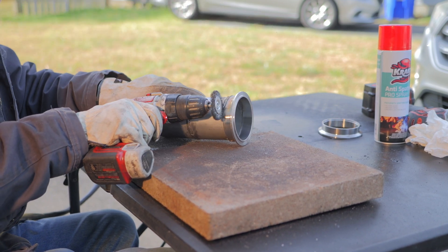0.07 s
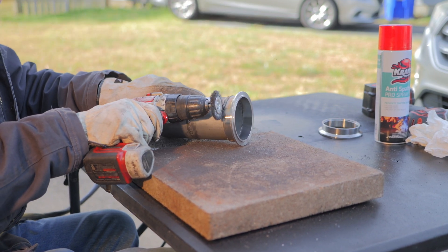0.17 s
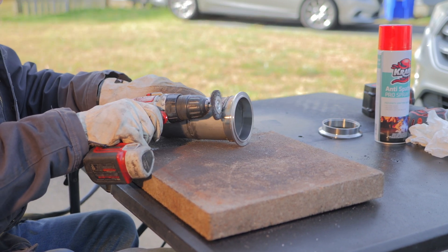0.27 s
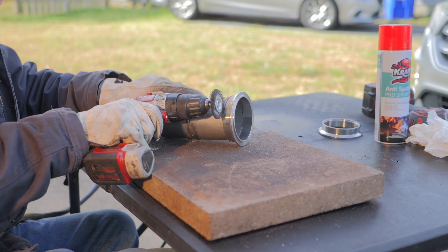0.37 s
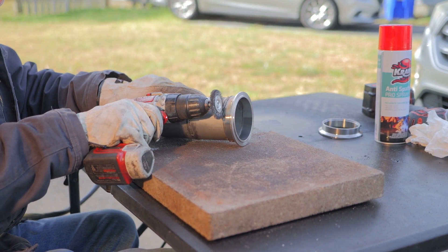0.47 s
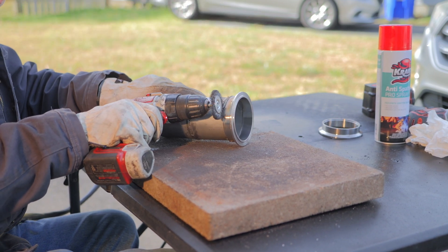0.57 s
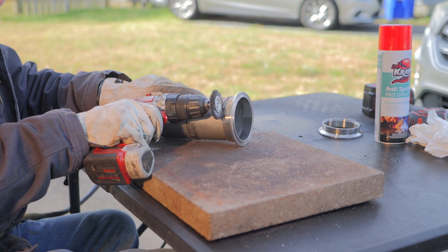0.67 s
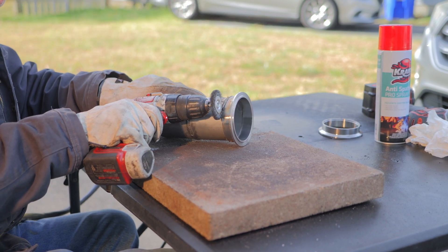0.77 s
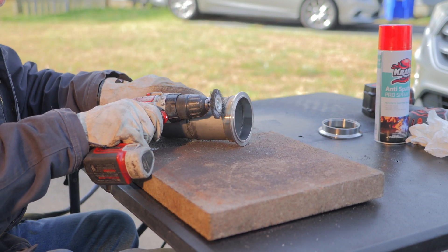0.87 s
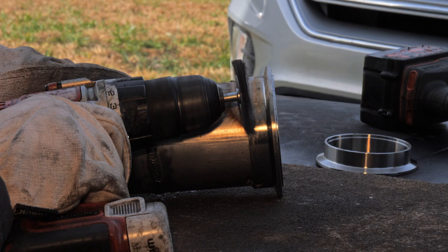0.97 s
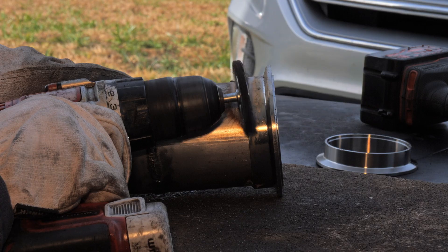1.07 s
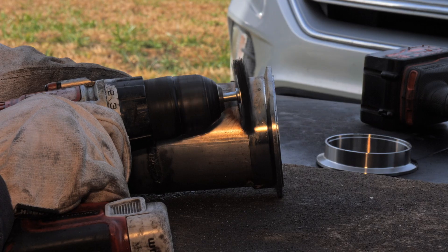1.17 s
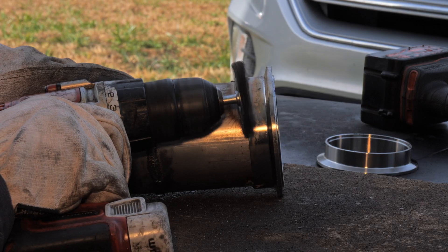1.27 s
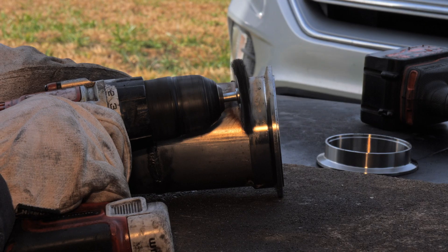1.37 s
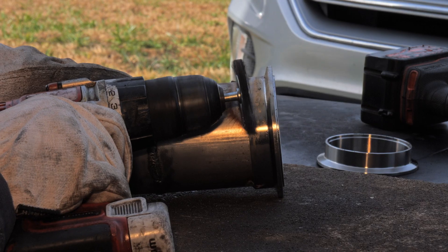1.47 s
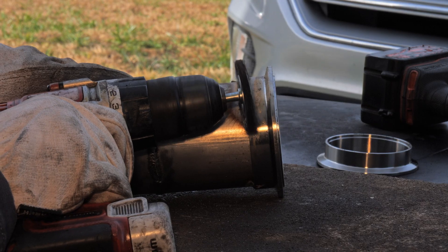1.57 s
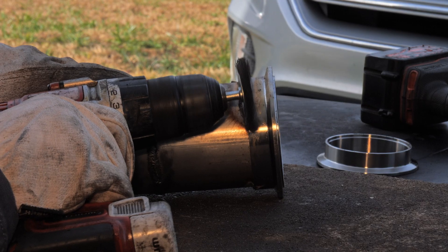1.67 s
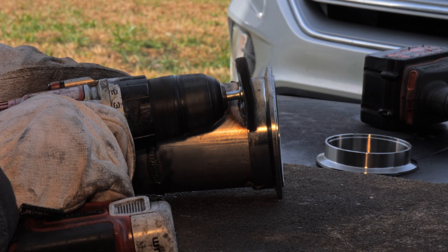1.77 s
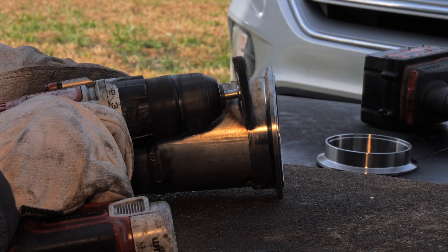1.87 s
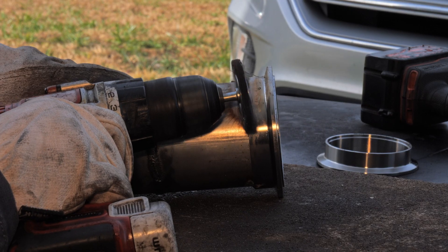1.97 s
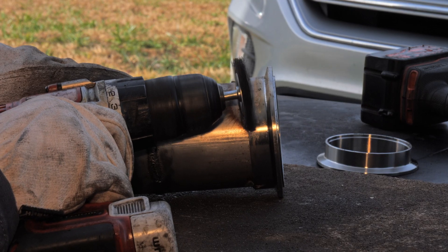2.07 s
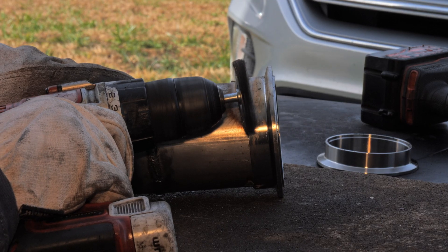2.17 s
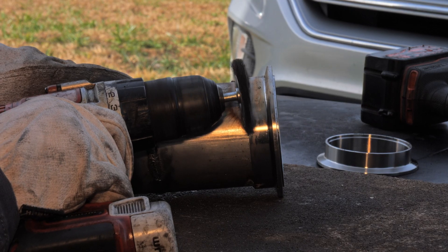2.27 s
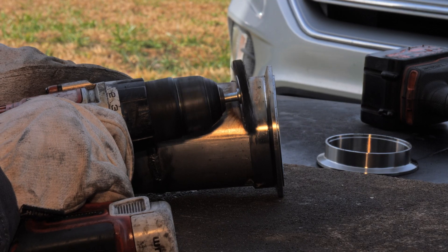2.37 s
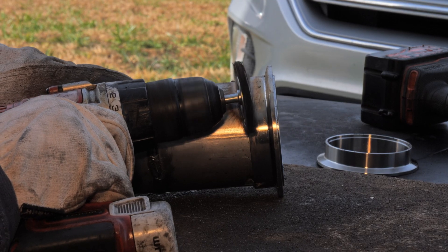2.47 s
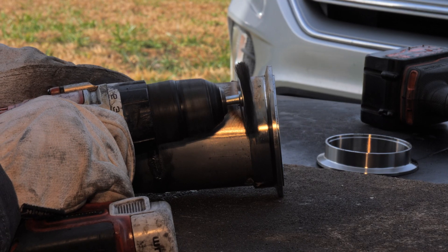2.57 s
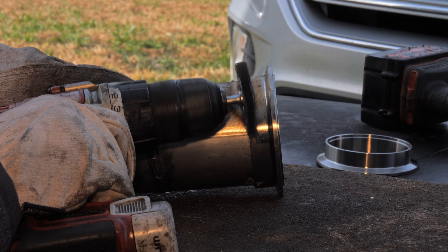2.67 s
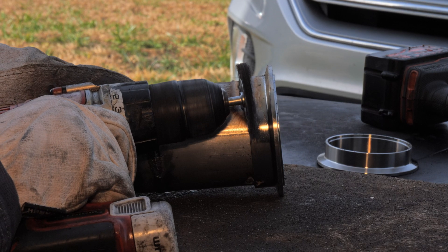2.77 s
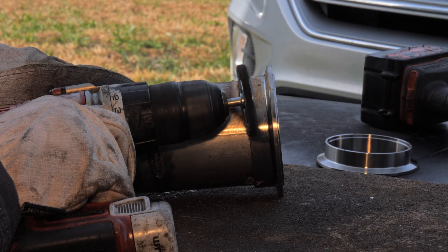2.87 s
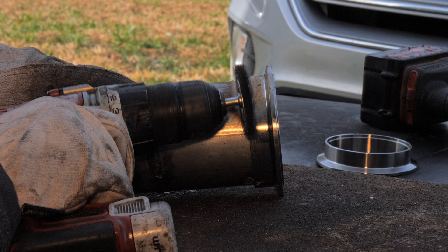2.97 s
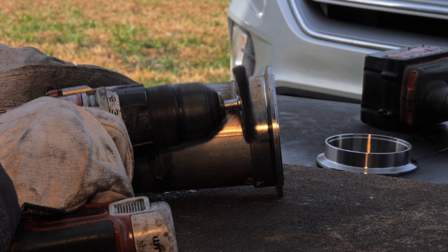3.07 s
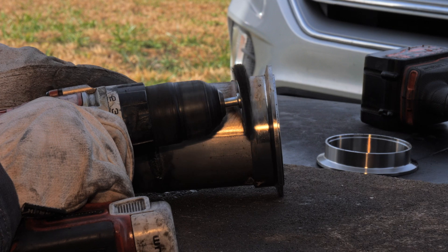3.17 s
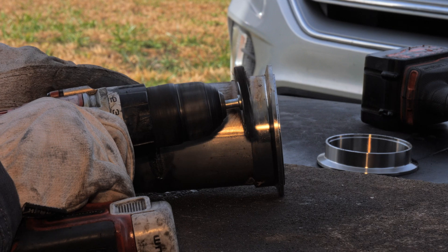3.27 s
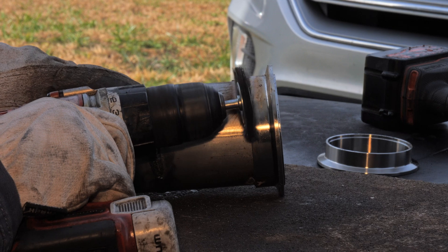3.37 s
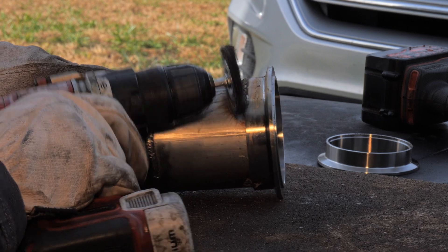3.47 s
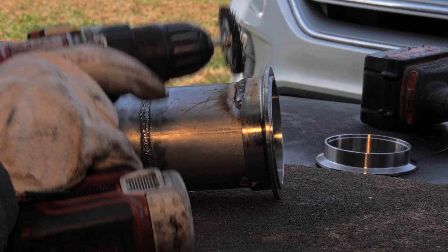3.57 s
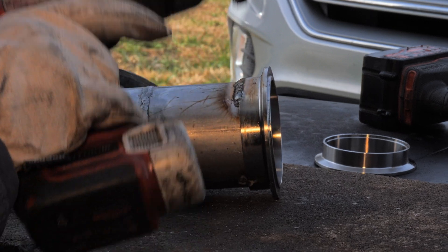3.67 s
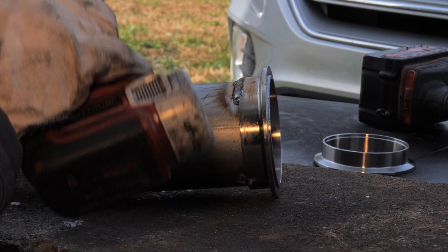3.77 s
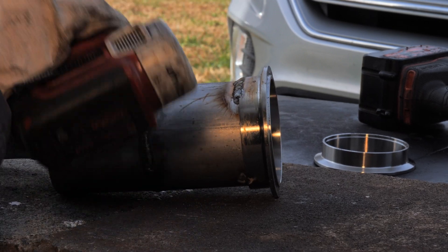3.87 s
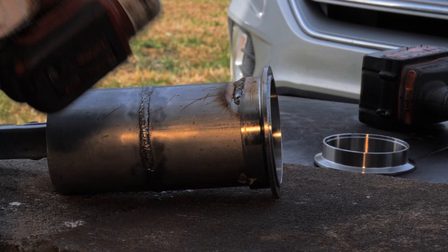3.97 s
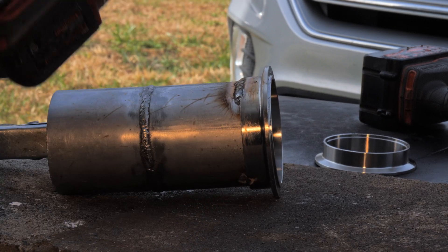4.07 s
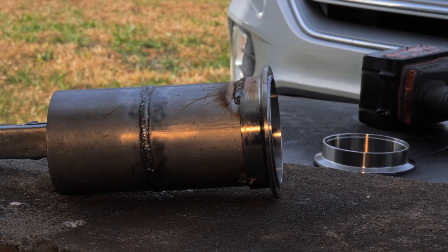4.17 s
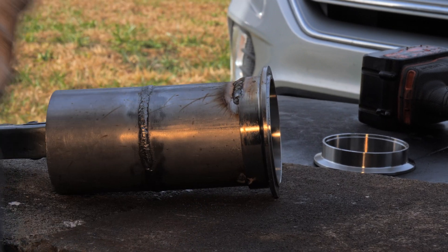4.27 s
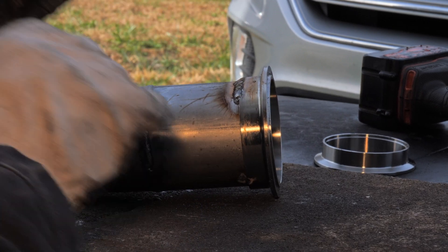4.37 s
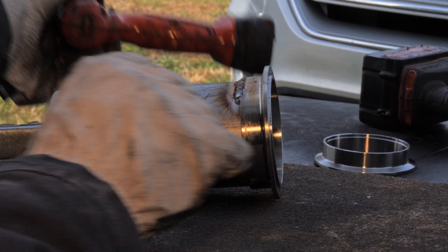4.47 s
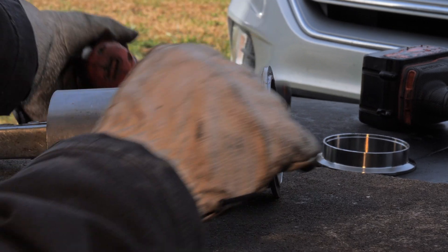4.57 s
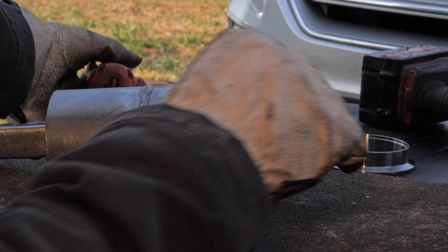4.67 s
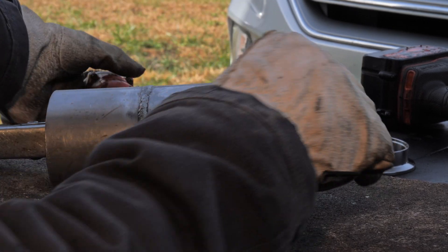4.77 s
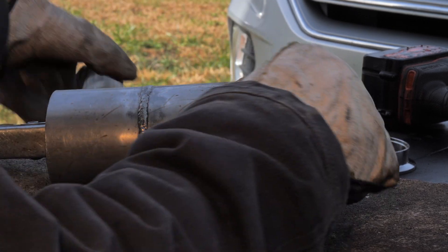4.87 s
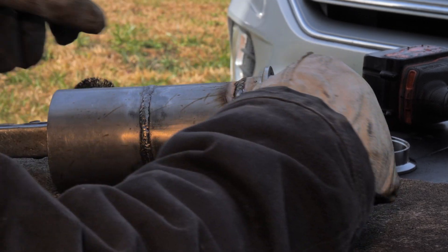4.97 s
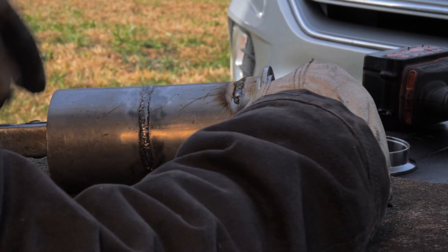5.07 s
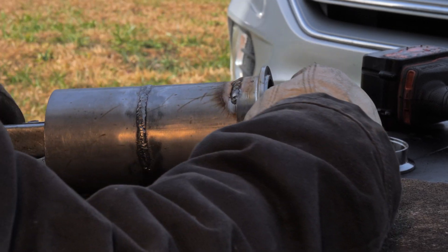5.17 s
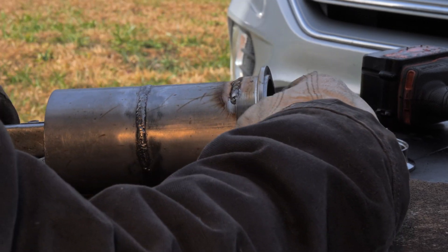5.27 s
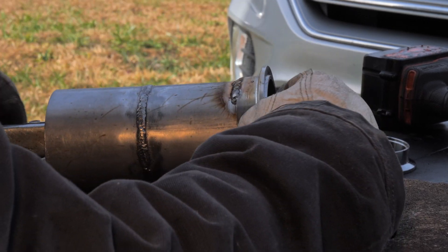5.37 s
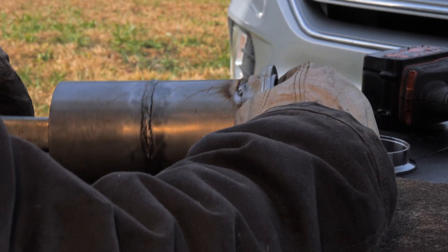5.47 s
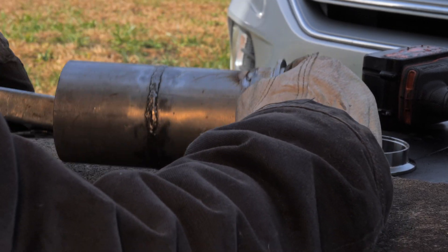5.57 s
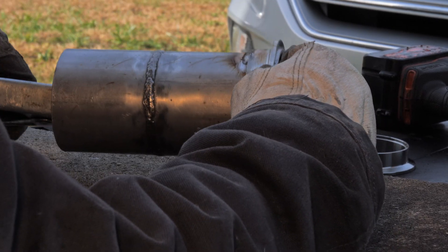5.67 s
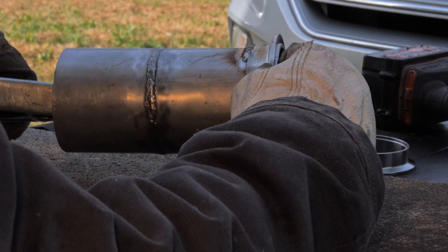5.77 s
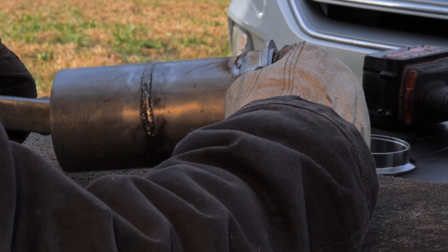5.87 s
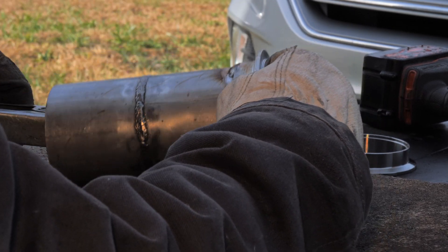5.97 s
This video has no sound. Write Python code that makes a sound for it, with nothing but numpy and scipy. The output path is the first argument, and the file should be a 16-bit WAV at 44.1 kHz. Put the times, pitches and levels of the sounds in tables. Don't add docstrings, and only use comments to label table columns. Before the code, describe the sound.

A wire wheel in a cordless drill grinds a pipe weld at an open garage door, harsh and throbbing, with irregular metallic pings. The trigger is released and the noise dies almost at once. In the exposed low rumble and faint distant hum, gloves tick and rustle; the tool knocks wood twice, hard and rattly, with a short dull tail, then the pipe chinks and handling fades to tiny taps. The microphone is near.

```python
import sys
import numpy as np
from scipy import signal
from scipy.fft import rfft, irfft
from scipy.io import wavfile
from scipy.ndimage import uniform_filter1d

SR = 44100
rng = np.random.default_rng(int(sys.argv[2]) if len(sys.argv) > 2 else 0)


def attenuation_scalar(level_db):
    decades = np.asarray(level_db, float) / 20
    return 10 ** decades


def generate_wav(sig):
    pcm = np.round(np.clip(np.atleast_2d(sig).T, -1, 1) * 32767).astype(np.int16)
    wavfile.write(sys.argv[1], SR, pcm)


N = 265746
T = np.arange(N) / SR
GEAR_DOWN, PLANETS = 15, 3
BRAKE_S, JOLT_S = 3.583, 0.078
WALL_HZ = 1900


def curve(rows):
    times, values = np.transpose(rows)
    return np.interp(T, times, values)


def colour(x, shape):
    hz, db = np.transpose(shape)
    f = np.arange(len(x) // 2 + 1) * SR / len(x) + 1
    gain = attenuation_scalar(np.interp(np.log(f), np.log(hz), db))
    y = irfft(rfft(x) * gain, len(x))
    return y / y.std()


def walk(rate):
    hold = max(int(SR / rate), 300)
    steps = np.repeat(rng.standard_normal(N // 300 + 1), hold)[:N]
    y = uniform_filter1d(uniform_filter1d(steps, hold), hold)
    return y / y.std()


def grit(scatter_db):
    return rng.standard_normal(N) * attenuation_scalar(scatter_db * np.minimum(rng.exponential(size=N), 5))


def add(out, s, x, db):
    i = int(s * SR)
    out[i:i + len(x)] += (x * attenuation_scalar(db) / np.abs(x).max())[:N - i]


def ring(hz, t60, gain, size=9000):
    t = T[:size, None]
    decay = np.exp(-np.log(1000) * t / t60)
    return (gain * np.sin(2 * np.pi * hz * t) * decay).sum(axis=1)


def crack(centre_hz, rise, fall, octaves=3.5, size=4000):
    t = T[:size]
    shape = [(centre_hz * 2 ** (octaves * k), -6.0 * k * k) for k in range(-3, 4)]
    noise = colour(rng.standard_normal(size), shape)
    return noise * (1 - np.exp(-t / rise)) * np.exp(-t / fall)


def push(hz, cycles, size=9000):
    age = T[:size] * hz / (0.25 * cycles)
    return -age * np.exp(1 - age) * np.sin(2 * np.pi * hz * T[:size])


def braked(x, corner_hz):
    low = signal.sosfiltfilt(signal.butter(3, corner_hz, fs=SR, output="sos"), x)
    return low + (x - low) * attenuation_scalar(np.interp(T, (3.55, 3.66), (0, -14)))


def spells(rows):
    away_s = [np.maximum(np.maximum(start - T, T - end), 0) for start, end, _ in rows]
    return np.max([row[2] - 110 * away for row, away in zip(rows, away_s)], axis=0)


def housing_rattle(turn, wobble):
    # frequency in Hz, level in dB.
    housing = [(40, 3), (100, -8), (200, -8), (350, -7.5), (600, 2), (1000, 7), (1400, 5), (1700, 4),
               (1900, -6.5), (2150, 2.5), (2500, 4.5), (3300, -17.5), (4500, -12)]
    throb_db = 0.067 * wobble + 0.95 * np.cos(turn) + 1.4 * walk(39.56)
    return colour(grit(2.17) * attenuation_scalar(throb_db), housing)


def pipe_wall(wobble, late):
    # frequency in Hz, width in Hz, level in dB.
    wall = [(1070, 54, -13), (1070, 63, -25), (1740, 170, 1.5), (1700, 32, -4), (2065, 47, -2.5)]
    tips = grit(2.5) * attenuation_scalar(walk(30))
    out = np.zeros(N)
    for hz, width, db in wall:
        throb = late if hz < WALL_HZ else wobble
        peak = [(hz - 3 * width, -20), (hz - width / 2, -3), (hz, 0), (hz + width / 2, -3),
                (hz + 3 * width, -20), (hz + 9 * width, -60)]
        out += attenuation_scalar(db) * colour(tips * attenuation_scalar(4 * throb), peak)
    return out


def wire_scratch(turn, wobble, lurch):
    # frequency in Hz, level in dB.
    wires = [(2000, -11), (3300, 0), (4300, 1), (5200, 2.5), (6300, 1.5), (7500, 1), (8500, 3.5),
             (10300, 8), (11300, 0.5), (12700, -9), (14200, -10), (15200, -1), (16500, -42)]
    throb_db = 0.6 * wobble + 0.96 * lurch + 1.2 * np.cos(turn) + 0.29 * walk(50)
    return colour(grit(1.2) * attenuation_scalar(throb_db), wires)


def gear_whine(turn, wobble, late, speed):
    orders_up = [2, 4, 5, 6, 7, *(.8 * np.array([3, 6, 7, 9, 12, 15, 16, 18, 19, 21, 23, 24, 27, 28, 29, 30, 31, 32, 33, 34, 49, 52, 53]))]
    # level at mid-run in dB, drift in dB per second.
    lines = [(-58, .1), (-62, 0), (-62, 5), (-48.3, 2.8), (-61.4, 1.7), (-45.8, -1), (-52, 2), (-58, -1.2),
             (-66, 3.3), (-54.9, 3), (-55.5, .4), (-58.4, 5.5), (-50.4, -2.9), (-60, -.5), (-54.5, -4.4),
             (-55, 1.4), (-60, -3), (-64, -1.2), (-58.3, -6.1), (-58.4, -4.2), (-54, .3), (-59, -3.2),
             (-61, -1.4), (-50, 3.6), (-58, 1.7), (-65.5, -.7), (-62, -.8), (-60, -1.4)]
    bends = [-1.3, 1.8, -2.8, -1.8, -2.1, .8, -2.1, .7, -1.2, -.8, .8, -2.5, -1.6, -2.6, .8, -.7, 2.2, 1,
             1.2, -1.2, -.2, 3.5, 2.5, -2.8, -1.8, 2.5, 1.5, -2.1]
    beats = [5.5] * 3 + [7, 5.5] + [2.5] * 4 + [1.5] * 19
    run_s = np.minimum(T, BRAKE_S) - 1.7
    fall_db = -400 * np.maximum(T - BRAKE_S + JOLT_S, 0)
    out = np.zeros(N)
    for k, (db, drift), bend, beat_db in zip(orders_up, lines, bends, beats):
        throb = late if k * speed[5][1] < WALL_HZ else wobble
        line_db = db + drift * run_s + bend * (run_s ** 2 - 1.1) + fall_db
        out += attenuation_scalar(line_db + beat_db * throb + walk(14)) * np.sin(k * turn + k * k)
    return out


def snags(turn):
    snag_db = [-28, -30, -16.5, -18.5, -16, -16, -15, -18, -23, -19, -16.5, -17, -15, -15, -19, -31, -16,
               -25, -16, -25, -17, -28, -17, -16.5, -16, -15, -14]
    # start in seconds, peak in dB, pitch in Hz.
    catches = [(0.076, -14, 880), (0.334, -21, 940), (0.495, -28, 1090), (0.87, -11, 1670),
               (0.901, -25, 856), (0.94, -25, 2120), (1.069, -28, 1130), (1.111, -14, 950),
               (1.323, -13, 1740), (1.362, -17, 1040), (1.45, -21, 1710), (1.535, -25, 2170),
               (1.579, -15, 1710), (1.654, -20, 840), (1.742, -18, 1720), (1.784, -17, 1620),
               (1.851, -20, 1730), (1.942, -19, 2090), (2.006, -23, 1100), (2.135, -18, 1030),
               (2.193, -25, 2090), (2.227, -19, 1700), (2.298, -13, 1680), (2.353, -11, 1700),
               (2.393, -18, 684), (2.442, -28, 2060), (2.521, -20, 1740), (2.604, -14, 2060),
               (2.651, -18, 1040), (2.78, -9, 1740), (2.838, -26, 1080), (2.973, -14, 2070),
               (3.084, -32, 1770), (3.122, -11, 1650), (3.171, -17, 2090), (3.25, -17, 2090),
               (3.292, -19, 2100), (3.383, -15, 1220), (3.424, -8, 1970), (3.473, -18, 2060)]
    snag_turns = GEAR_DOWN * PLANETS * np.arange(1, len(snag_db) + 1) - 6
    snag_s = np.interp(snag_turns, turn / (2 * np.pi), T)
    out = np.zeros(N)
    for s, peak_db in zip(snag_s, snag_db):
        add(out, s, crack(5600, 0.00077, 0.017, octaves=0.87), peak_db - 8.5)
    for s, peak_db, hz in catches:
        add(out, s, push(hz, 6.7), peak_db - 10.5)
    return out


def drill():
    # time in seconds, turns a second.
    speed = [(0.0, 367.8), (0.15, 367.2), (0.45, 362.1), (0.9, 357.8), (1.35, 353.8), (1.8, 348.3),
             (2.1, 350.7), (2.4, 348.2), (2.95, 351), (3.15, 348.0), (3.45, 340.9), (3.6, 341.7),
             (3.7, 290)]
    # time in seconds, level in dB.
    pressure = [(0.0, -33.5), (0.8, -33), (1.14, -32.5), (3.0, -32), (3.36, -31.5), (3.41, -30.5),
                (3.46, -31.5), (3.54, -33.5)]
    turn = 2 * np.pi * np.cumsum(curve(speed)) / SR
    snagging = snags(turn)
    chuck = turn / GEAR_DOWN + 0.68
    wobble = np.cos(chuck + 0.052 * walk(2.5))
    late = np.cos(chuck - 1.1)
    lurch = np.cos(2 * (turn / GEAR_DOWN) / PLANETS + 0.63 * walk(0.88))
    turn = turn + 0.013 * walk(26.4)

    press_db, since = curve(pressure), np.maximum(T - BRAKE_S, 0)
    jolt_db = np.exp(-((T - BRAKE_S) / JOLT_S) ** 2)
    rattle_db = press_db + 0.37 + jolt_db - 170 * since
    scratch_db = press_db - 0.6 - 250 * since
    bite_db = -5 * np.exp(-T / 0.38)

    body = braked(housing_rattle(turn, wobble), 1850)
    body = body + attenuation_scalar(-10.5 + bite_db) * pipe_wall(wobble, late)
    bright = attenuation_scalar(-0.23) * braked(wire_scratch(turn, wobble, lurch), 7800)
    bright = bright + attenuation_scalar(37.0) * gear_whine(turn, wobble, late, speed)
    return snagging + attenuation_scalar(rattle_db) * body + attenuation_scalar(scratch_db) * bright


def outdoors():
    # frequency in Hz, level in dB.
    rumble_shape = [(25, 14.5), (60, -7), (120, -4), (200, -10.5), (400, 1.5), (700, -7), (1200, -8),
                    (1900, -14.5), (2400, -23.5), (3300, -27.5), (6000, -31), (10000, -35), (16000, -35.5)]
    # frequency in Hz, level in dB.
    hum = [(96.9, -68.5), (193, -57.5), (390, -67), (597, -57)]
    # Low, high and middle tones that come and go, in Hz.
    tones_hz = (523.4, 1753, 772)
    # start in seconds, end in seconds, level in dB.
    low_spells = [(0.0, 1.3, -48), (1.3, 3.7, -47), (3.85, 4.2, -55), (4.65, 5.22, -62), (5.4, 5.65, -57),
                  (5.85, 6.1, -46.5)]
    high_spells = [(0.0, 3.72, -56), (4.0, 4, -58.5), (5.2, 6.7, -57)]
    mid_spells = [(3.62, 4.08, -55.5)]
    swell_db = -40 + walk(1.82) + 0.5 * walk(24)
    out = attenuation_scalar(swell_db) * colour(rng.standard_normal(N), rumble_shape)
    levels = [spells(rows) for rows in (low_spells, high_spells, mid_spells)]
    for hz, db in [*hum, *zip(tones_hz, levels)]:
        flicker = attenuation_scalar(1.6 * walk(8))
        out += 2 ** 0.5 * flicker * attenuation_scalar(db) * np.sin(2 * np.pi * hz * T + 0.29 * walk(4.2))
    return out


def bumps():
    # frequency in Hz, 60 dB fall time in seconds, level in dB.
    block = [(87, 0.13, -10), (127, 0.058, -21), (183, 0.044, 1), (247, 0.053, 2), (300, 0.042, 4),
             (372, 0.051, 3.5), (517, 0.035, 7.5), (574.6, 0.03, 12), (960, 0.015, 4), (1124, 0.045, -2.5),
             (1230, 0.0067, -27.5), (1620, 0.016, 7)]
    # start in seconds, peak in dB, centre in Hz, cycles rung.
    bounces = [(4.683, -5, 196, 3.5), (4.695, 2.5, 352, 1.63), (4.702, -17, 234, 3.3),
               (4.713, -10, 380, 1.3), (4.721, -14, 223, 0.85), (4.732, -5, 334, 1.9), (4.74, -3, 393, 1.3),
               (4.763, -9.5, 226, 1.9), (4.777, -13, 385, 3.4), (4.792, -24, 252, 3.3),
               (4.808, -19, 340, 3.2), (4.853, -27, 360, 2.3), (4.956, -27, 343, 2.5),
               (4.9945, -0.5, 342, 1.4), (5.0, -10, 300, 4), (5.0104, 1, 398, 1.9), (5.018, -1, 375, 2.5),
               (5.0232, 1.5, 338, 2.8), (5.0488, -3.5, 330, 3.2), (5.054, -23, 318, 1.4),
               (5.068, -13, 275, 3.3), (5.083, -28, 180, 2.9), (5.095, -25, 205, 1.8),
               (5.116, -12, 226, 1.6), (5.1318, -9.5, 177, 1.7), (5.1387, -11, 372, 5.1),
               (5.175, -21, 261, 1.4), (5.227, -27, 320, 1.5)]
    # start in seconds, peak in dB, centre in Hz, cycles rung,
    # rattle in dB.
    more_bounces = [(3.552, -23, 640, 11, -38), (3.567, -24, 616, 3.6, -23), (3.579, -20.5, 570, 3.6, -29),
                    (3.573, -29, 1660, 89, -45), (3.602, -29, 1605, 50, -45), (4.124, -34, 1100, 2, -48),
                    (4.6833, -21, 1190, 3.5, -32), (4.986, -15, 1300, 6.9, -32), (4.9848, -23.5, 1730, 26, -31),
                    (5.024, -12, 1186, 7.6, -26), (4.087, -47, 616, 2.1, -32), (4.096, -38, 452, 1.6, -27),
                    (4.11, -19.5, 1200, 3, -28), (4.239, -33.5, 536, 6.6, -56), (4.683, -6, 550, 3.4, -14),
                    (4.984, -10.5, 654, 2, -14.5), (5.011, -4.5, 625, 8.7, -11.5), (5.028, -5, 415, 1.1, -14.5),
                    (5.1155, -17.5, 603, 1.6, -30), (5.156, -13.5, 720, 3.4, -33), (5.191, -24.5, 770, 4.1, -40),
                    (5.135, -30, 800, 2, -37), (5.6052, -26, 1000, 4, -31), (5.714, -31, 530, 2.2, -38),
                    (5.795, -25, 990, 4.3, -32), (5.933, -28, 523, 3.1, -35)]
    # start in seconds, peak in dB, pitch in Hz, cycles rung.
    thumps = [(4.683, -4.5, 118, 1.46), (4.688, -21, 83.4, 1.4), (4.684, -15.5, 77, 2.6),
              (4.99, -11.5, 80.2, 3.6), (5.085, -36, 90, 2.2), (4.739, -12.5, 135, 1.8),
              (4.987, -6.5, 83, 1.4), (4.999, -10, 125, 2.7), (5.013, -3.5, 125.4, 1.9),
              (5.084, -39, 110, 1.2), (5.131, -28, 137, 2.3)]
    out = np.zeros(N)
    hz, t60, db = np.transpose(block)
    bounces = [(*row, -25.5 + 0.51 * row[1]) for row in bounces]
    for s, peak_db, centre_hz, cycles, rattle_db in bounces + more_bounces:
        near = np.exp(-0.5 * (np.log2(hz / centre_hz) / 1.15) ** 2)
        reach = attenuation_scalar(db) * near * (-1) ** np.arange(len(hz))
        add(out, s, push(centre_hz, cycles), peak_db - 3.5)
        wood = ring(hz, t60, reach) * (1 - np.exp(-T[:9000] * centre_hz / 0.18))
        add(out, s, wood, peak_db - 4.5 - 2.5 * cycles)
        add(out, s, crack(865, 0.001, 0.0034, octaves=0.78), rattle_db)
    for s, peak_db, table_hz, cycles in thumps:
        add(out, s, push(table_hz, cycles), peak_db - 0.5)
    return out


def gloves():
    # time in seconds, peak in dB.
    rustle = [(3.8, -56), (4.1, -45), (4.21, -62), (4.62, -56), (4.7, -37), (4.87, -47), (4.91, -45),
              (4.945, -46), (5.03, -35.5), (5.14, -41), (5.3, -48), (5.431, -46.5), (5.54, -45.5),
              (6.03, -53)]
    # start in seconds, peak in dB, centre in Hz.
    scuffs = [(3.7399, -47, 7580), (4.082, -44, 5000), (4.086, -37, 5850), (4.0905, -36, 6000),
              (4.1005, -42, 4500), (4.084, -34, 2000), (4.091, -32, 2000), (4.098, -44, 2200),
              (4.095, -29, 5900), (4.104, -34, 5500), (4.11, -37, 4240), (4.1264, -43, 6500),
              (4.134, -41, 6070), (4.1474, -42, 4040), (4.182, -48, 5500), (4.2076, -45, 7000),
              (4.212, -49, 6500), (4.2174, -49, 6070), (4.2225, -49, 6500), (4.2274, -46, 9400),
              (4.6832, -24.5, 5170), (4.695, -30, 7170), (4.7114, -43, 6490), (4.7395, -34, 5500),
              (4.804, -42, 8240), (4.984, -15.5, 7800), (4.996, -30, 5560), (5.011, -21, 5500),
              (5.0155, -29, 6000), (5.0252, -18, 6600), (5.028, -27, 5000), (5.039, -33, 6500),
              (5.048, -34, 6480), (5.155, -40, 9600), (5.242, -49, 6000), (5.296, -48, 7000),
              (5.467, -41, 5500), (5.488, -55, 3940), (5.5463, -46, 7830), (5.598, -40.5, 3860),
              (5.603, -46, 5320), (5.7932, -45, 11800)]
    swells = [db + np.minimum(300 * (T - s), -130 * (T - s)) for s, db in rustle]
    level_db = np.maximum(np.max(swells, axis=0), -89) + 2.5
    cloth = [(800, 17.0), (3000, -1.0), (6000, -3.5), (10000, -8.0), (16000, -17)]
    out = attenuation_scalar(level_db) * colour(grit(1.3) * attenuation_scalar(2.2 * walk(60)), cloth)
    for s, peak_db, centre_hz in scuffs:
        add(out, s, crack(centre_hz, 0.00034, 0.004, octaves=0.78), peak_db)
    return out


def chinks():
    # frequency in Hz, 60 dB fall time in seconds, then level in dB
    pipe = [(1740, 0.053, -10, -15, -8), (2350, 0.037, -17, -10, -22), (3150, 0.029, -11, -13, -28),
            (4350, 0.043, -25, -9, -30), (4770, 0.043, -22, -16, -26), (5170, 0.03, -20, -16, 3),
            (6331, .04, -24, -12, -28), (6600, .06, -18, -17, -20), (6900, 0.1, -18, -28, -5),
            (7030, .055, -22, -20, -17), (7700, .043, -22, -11, -22), (7830, .047, -18, -25, 1),
            (8070, 0.038, -3, -25, -20), (8960, 0.067, 1.5, -3, 1.5), (9500, 0.042, -2, -22, -14),
            (10000, .035, -18, -25, -14), (10570, .05, -12, -22, -13), (10520, 0.049, -3, -25, -22),
            (11780, 0.042, -13, -25, -20), (11800, .034, -20, -25, -12), (12250, .033, -13, -17, -11),
            (12980, .045, -16, -21, -13), (13370, .03, -5, -24, -14), (14800, .04, -20, -24, -19),
            (15300, .04, -20, -26, -24)]
    # start in seconds, peak in dB, share of the ringing time left, crack in dB.
    touches = [
        (5.1917, -16, 0.81, -3.5),
        (5.2926, -54, .6, -3),
        (5.3248, -28.5, 1, -8),
        (5.355, -38, 0.8, -11),
        (5.3627, -26, 0.95, -2),
        (5.3904, -42, 0.74, -14),
        (5.998, -52.5, 0.81, 10),
        (6.016, -50, 0.98, 5),
    ]
    spots = [0, 1, 1, 2, 2, 2, 0, 0]
    out = np.zeros(N)
    hz, t60, *db = np.transpose(pipe)
    for (s, peak_db, damping, crack_db), spot in zip(touches, spots):
        gain = attenuation_scalar(db[spot]) * (-1) ** np.arange(len(hz))
        add(out, s, ring(hz, t60 * damping, gain) * (1 - np.exp(-T[:9000] / 0.0007)), peak_db)
        add(out, s, crack(11000, 0.00035, 0.0065), peak_db + crack_db)
        add(out, s, crack(6500, 0.0005, 0.0072, octaves=1.0), peak_db + crack_db - 8)
    return out


def scene():
    steady = drill() + outdoors()
    hits = signal.sosfilt(signal.butter(2, 62, "high", fs=SR, output="sos"), bumps())
    hits = hits + gloves() + chinks()
    tail = colour(rng.standard_normal(12000), [(100, 4.5), (1500, -5.0), (4000, 1.5), (12000, -26)])
    tail = tail * np.exp(-np.log(1000) * T[:12000] / 0.43) * (T[:12000] > 0.004)
    wet = signal.fftconvolve(hits, tail / np.linalg.norm(tail))[:N]
    return (hits + attenuation_scalar(-20.0) * wet + steady)[None]


def top_cut(x):
    return signal.sosfilt(signal.butter(12, 16820, fs=SR, output="sos"), x)


def record(dry):
    notch_hz = (2700, 2870, 3612, 4640)
    # width in Hz, depth in dB.
    notches = [(530, -45), (530, -25), (490, -42), (484, -38)]
    x = 1.1 * np.tanh(dry / 1.1)
    x = signal.sosfilt(signal.butter(5, 63, "high", fs=SR, output="sos"), x)
    x = signal.sosfilt(signal.ellip(10, 0.3, 45, 15800, fs=SR, output="sos"), x)
    for hz, (width_hz, db) in zip(notch_hz, notches):
        w, a = 2 * np.pi * hz / SR, np.pi * width_hz / SR
        top = [1 + a * attenuation_scalar(db), -2 * np.cos(w), 1 - a * attenuation_scalar(db)]
        x = signal.lfilter(top, [1 + a, -2 * np.cos(w), 1 - a], x)
    fade = np.clip((T[-1] - 0.003 - T) / 0.001, 0, 1)
    x = x / (1 + x ** 8) ** (1 / 8) * fade
    return top_cut(x)


dry = scene()
out = record(dry)
generate_wav(out)
```